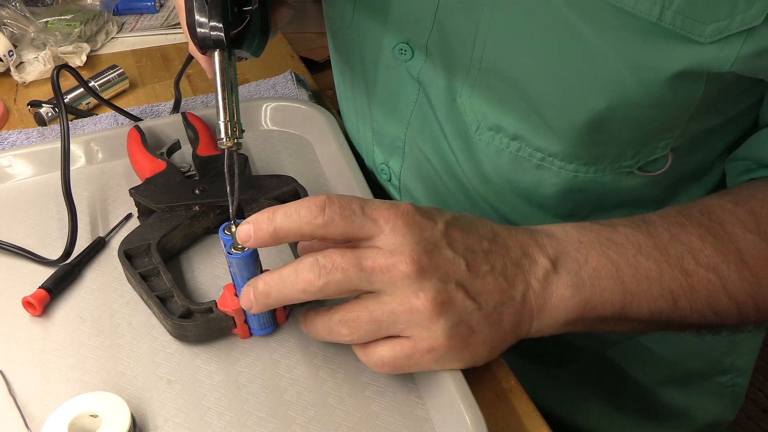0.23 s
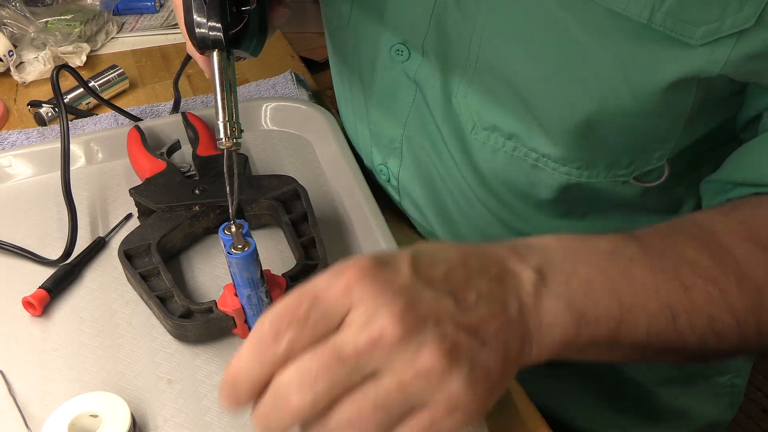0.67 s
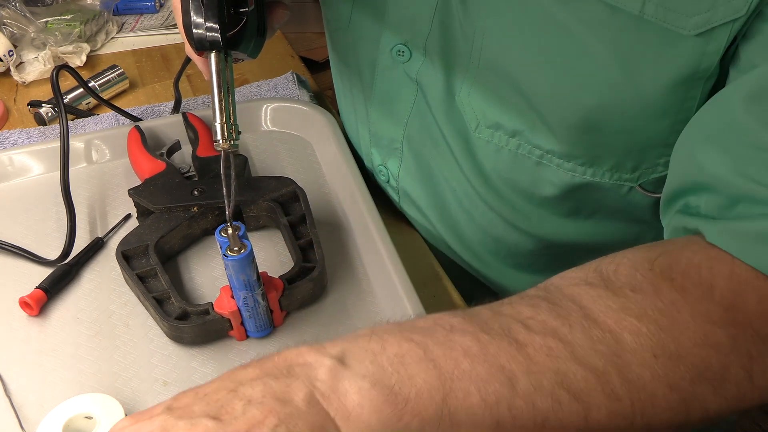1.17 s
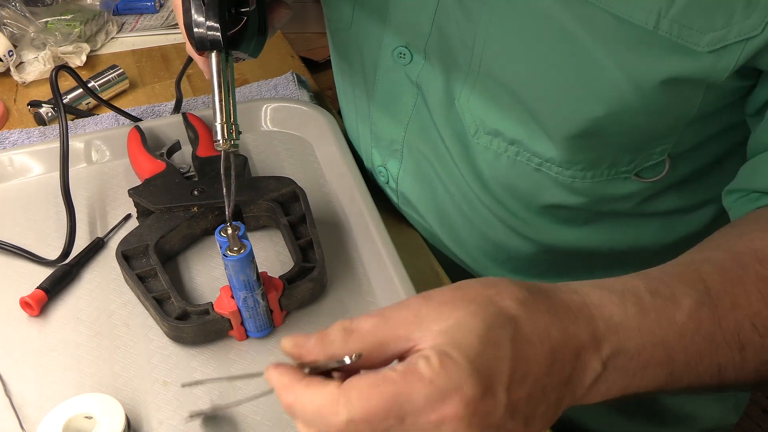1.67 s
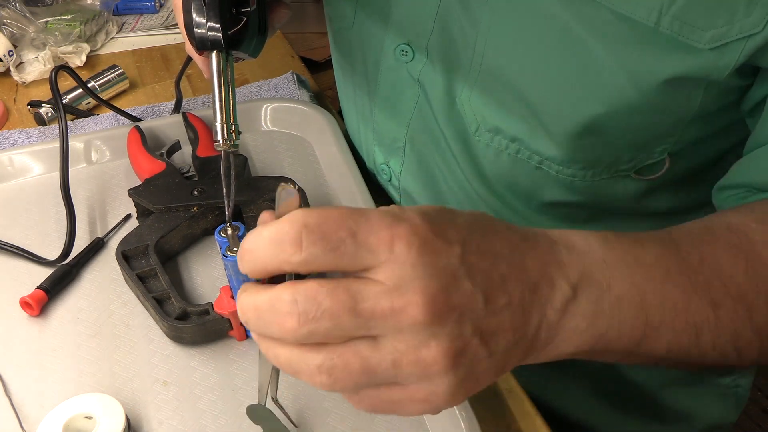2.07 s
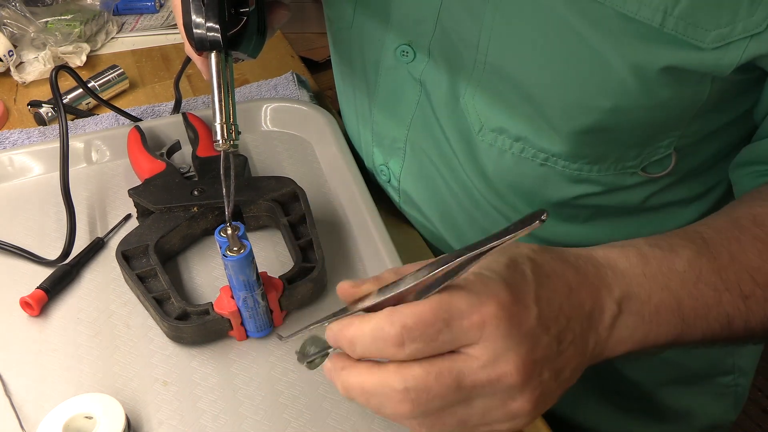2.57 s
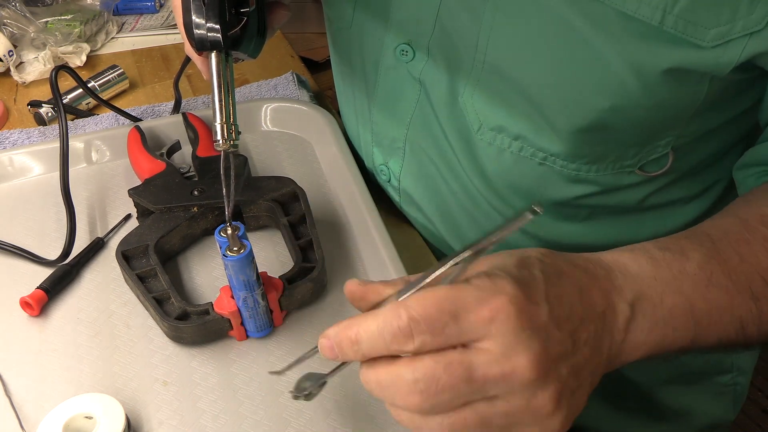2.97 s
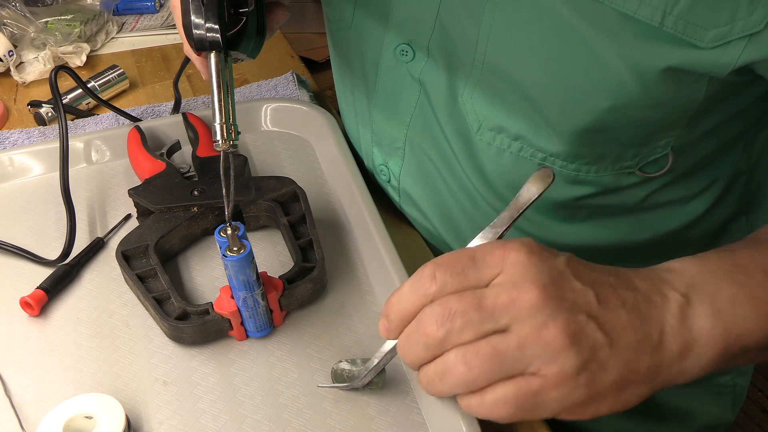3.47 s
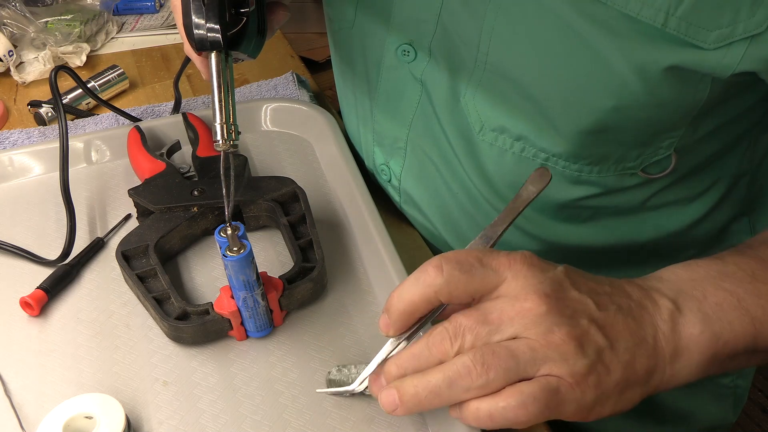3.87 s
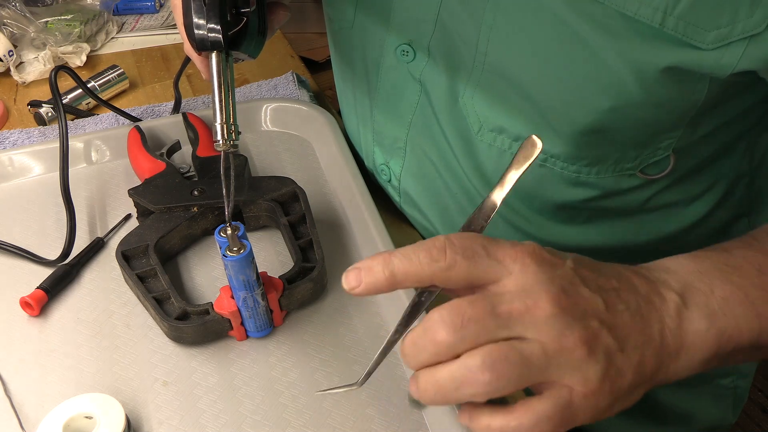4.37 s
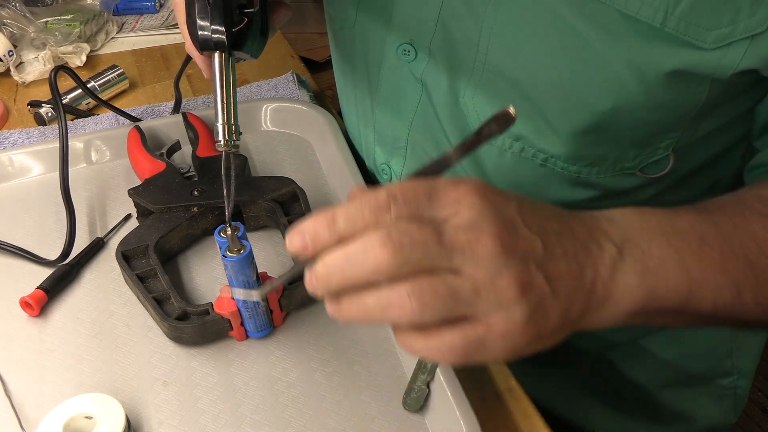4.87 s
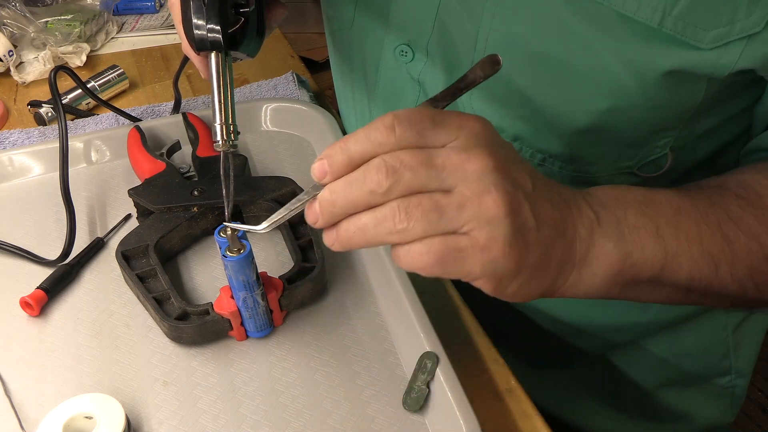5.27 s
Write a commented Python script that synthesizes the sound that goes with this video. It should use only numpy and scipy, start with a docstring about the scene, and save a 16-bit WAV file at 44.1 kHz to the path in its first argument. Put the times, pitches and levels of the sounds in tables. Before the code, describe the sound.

Close, dry clatter of steel tweezers against a hollow plastic tray, one loud knock, then sparse small taps and ticks above low rumble.

```python
"""Short hollow clatter, light metallic clicks and scrapes over a low hum, close and nearly mono.
Metal tweezers are fetched from a plastic tray, knock against it and pick up a thin metal strip.
Each knock or click is an impulse into decaying modes; each scrape is a train of tiny slips.
Filtered noise makes the rumble and hum of the small workshop, and a noise echo its reverberation."""
import sys
import numpy as np
from scipy import signal
from scipy.fft import rfft, irfft
from scipy.io import wavfile

SR = 44100
rng = np.random.default_rng(int(sys.argv[2]) if len(sys.argv) > 2 else 0)


def put_to_file(sound):
    """Save the sound as 16-bit audio at rate SR, in the file named by the first command-line argument."""
    columns = np.atleast_2d(sound).T  # one column per channel
    safe = np.clip(columns, -1, 1)
    whole_steps = np.round(safe * 32767)
    wavfile.write(sys.argv[1], SR, whole_steps.astype(np.int16))


N = 243431  # samples in the scene

# mean modes of the tray and what lies on it: pitch_hz, relative level_db, t60_s
TRAY_MODES = [(340.3, -3, 0.07), (412, 1.5, 0.043), (423, -4, 0.049), (531, -3.5, 0.046),
              (570.4, 2.5, 0.035), (673, -2.5, 0.047), (774, -3.5, 0.045), (940, -0.5, 0.02),
              (1068, 1, 0.016), (1157, -3, 0.021), (1230, -18, 0.026), (1754, 6, 0.026), (2007, 0, 0.033),
              (2280, -29, 0.028), (2660, 8, 0.026), (2730, -9, 0.055), (3400, -18, 0.047),
              (3360, -5.5, 0.065), (4430, 6, 0.045), (6240, 1, 0.037), (8080, 5.5, 0.029),
              (8450, -18, .035), (10600, -23, 0.04)]
# mean modes of the tweezers and strip: pitch_hz, relative level_db, t60_s
STEEL_MODES = [(1080, -7, 0.015), (1270, -7, 0.029), (2314, -1.5, 0.044), (2520, -12, 0.022),
               (3260, -4, 0.027), (3800, -12, 0.09), (7400, 1, 0.0051), (8500, 6, 0.0057), (8920, 7, 0.014),
               (9170, -1, 0.016), (11300, 10, 0.0053)]


def amp(db):
    """A level in decibels is twenty times the logarithm of the amplitude ratio returned here."""
    return 10 ** (np.asarray(db) / 20)


def evened(x):
    """The root mean square measures a sound's strength; here it is brought to 1."""
    return x / np.sqrt(np.mean(x ** 2) + 1e-20)


def read(points, hz):
    """Hearing is nearly logarithmic in pitch, so a table is interpolated over log frequency."""
    f, value = np.transpose(points)
    return np.interp(np.log(hz + 1), np.log(f + 1), value)


def add(mix, start_s, sound):
    """Superposition: sounds that overlap in time simply add."""
    part = mix[max(round(start_s * SR), 0):][:len(sound)]
    part += sound[:len(part)]


def band(x, edges_hz):
    """A causal band-pass keeps one range of frequencies and never sounds before its input."""
    edges_hz = np.clip(edges_hz, 20, SR / 2 - 100)
    sos = signal.butter(3, edges_hz, "band", fs=SR, output="sos")
    return signal.sosfilt(sos, x)


def coloured(x, points):
    """Spectral shaping: each frequency is weighted by a table in dB, then the rms is set to 1."""
    gain = amp(read(points, np.fft.rfftfreq(len(x), 1 / SR)))
    return evened(irfft(rfft(x) * gain, len(x)))


def decay_db(t, t60):
    """Exponential decay: the level falls in a straight line, 60 dB in one t60."""
    return -60 * t / t60


def ringing(modes, dense_db, dense_t60, spot_hz=1000, spot_db=0, scatter_db=2.5, detune_hz=12):
    """Modal response to an impulse: clear decaying modes, and a noise crack of modes too dense to part."""
    t = np.arange(SR // 5) / SR
    hz, db, t60 = np.transpose(modes)[:, :, None]
    hz = hz + detune_hz * rng.standard_normal(hz.shape)  # each contact loads the body a little differently
    favoured = np.exp(-(np.log(hz / spot_hz) / 0.088) ** 2)  # modes near the pitch of the touched spot
    db = db + scatter_db * rng.standard_normal(hz.shape) + spot_db * favoured
    clear = (amp(db + decay_db(t, t60)) * np.cos(2 * np.pi * hz * t)).sum(0)
    dense = amp(dense_db + decay_db(t, dense_t60)) * rng.standard_normal(len(t))
    return clear + dense


def range_levels(ranges, shares_db, strength_db, hardness, spot_hz=0):
    """Contact stiffness: a harder contact tilts the ranges to the treble, and the spot lifts its own."""
    low, high = np.transpose(ranges)
    octaves = np.log2(np.sqrt(low * high / (low[0] * high[0])))  # between centres, from the lowest range
    spot_lift_db = 6 * ((low < spot_hz) & (spot_hz < high))
    return strength_db + np.array(shares_db) + hardness * octaves + spot_lift_db


def contact(ring, ranges, levels_db):
    """Impact excitation: hardness and place of contact set how strongly each range answers."""
    first = round(.006 * SR)  # the levels hold for the first 6 ms
    parts = [band(ring, edges_hz) for edges_hz in ranges]
    return sum(amp(db) * part / np.std(part[:first]) for part, db in zip(parts, levels_db))


def workshop(floor_db=-41.5, hiss_db=-66.5):
    """Filtered noise: rumble and a wavering hum, common to both sides, and a faint hiss in each."""
    # spectrum of the quiet room: pitch_hz, relative level_db (per Hz)
    floor = [(11, -42), (18, -5.5), (59, -2.5), (72, -5.5), (88, -12), (120, -10), (225, -17.5),
             (344, -16.5), (374, -20.5), (589, -25.5), (927, -32), (1420, -32.5), (1880, -39.5),
             (11600, -46.5), (15800, -50)]
    # hum and murmuring resonances: pitch_hz, width_hz (at half amplitude), level_db (rms)
    hum = [(57.04, 6.8, -44.5), (118.2, 4.1, -53.5), (155.9, 3.9, -58.5), (1230, 110, -72.5)]
    hz = np.fft.rfftfreq(N, 1 / SR)
    air = amp(floor_db) * coloured(rng.standard_normal(N), floor)
    for centre_hz, width_hz, db in hum:
        resonance = 1 / (1 + (2 * (hz - centre_hz) / width_hz) ** 2)
        murmur = irfft(rfft(rng.standard_normal(N)) * resonance, N)
        air += amp(db) * evened(murmur)
    return air + amp(hiss_db) * rng.standard_normal((2, N))


def room(x, early_db=-11, early_t60=0.073, late_db=-20):
    """Reverberation: quick reflections from bench and body, then the faint tail of a small room."""
    # decay of the tail: pitch_hz, t60_s
    tail_t60 = [(120, 0.4), (500, 0.19), (2000, 0.33), (6000, 0.37), (14000, 0.042)]
    t = np.arange(SR // 2) / SR
    # sparse reflections of random sign, 3000 per second on average
    taps = rng.choice([-1., 1.], len(t)) * (rng.random(len(t)) < 3000 / SR) * (t > .004)
    hz, at, z = signal.stft(taps, SR, nperseg=256)
    fading = z * amp(decay_db(at, read(tail_t60, hz)[:, None]))
    late = signal.istft(fading, SR, nperseg=256)[1][:len(t)]
    early = rng.standard_normal(len(t)) * (t > .003) * amp(decay_db(t, early_t60))
    echo = amp(early_db) * early / np.linalg.norm(early) + amp(late_db) * late / np.linalg.norm(late)
    return signal.fftconvolve(x, echo)[:N]


def scrapes(slips_per_s=5000, uneven_db=3):
    """Stick-slip friction: tiny impulses of sliding steel ring tray and steel and hiss at the contact."""
    # strokes: start_s, length_s, strength_db, hardness_db_per_octave, favoured pitch_hz of the rubbed spot
    strokes = [(0, .19, -60.5, -3, 2580), (.541, 0.018, -50.5, -2, 2480), (1.124, 0.033, -48.5, -0.5, 970),
               (1.148, 0.049, -48, 0.7, 850), (1.182, .091, -54, .5, 613), (1.241, 0.041, -48.5, .6, 696),
               (1.868, 0.024, -34, -5.5, 413), (1.891, 0.04, -38, -2.5, 2520),
               (3.326, .0194, -33, -2.2, 415), (3.931, 0.04, -56, 0.7, 1140),
               (4.203, .083, -70.5, 4.5, 620)]
    # edges of the tray, steel and hiss ranges: low_hz, high_hz
    ranges = [(300, 1300), (1550, 3050), (4000, 12000)]
    # share of an ordinary stroke in tray, steel and hiss: level_db
    shares_db = [0.5, -6.5, -9]
    # colour of steel sliding on plastic: pitch_hz, relative level_db
    hiss_colour = [(2000, -7), (4000, -7), (5500, -7), (8500, -3), (11500, -13), (13500, -18), (16000, -32)]
    out = np.zeros(N)
    for start_s, length_s, strength_db, hardness, spot_hz in strokes:
        tray_db, steel_db, hiss_db = range_levels(ranges, shares_db, strength_db, hardness, spot_hz)
        n = int(length_s * SR)
        sizes = rng.standard_normal(n) * amp(uneven_db * rng.standard_normal(n))
        slips = sizes * (rng.random(n) < slips_per_s / SR)
        slips = np.pad(slips * signal.windows.tukey(n, .6), (0, SR // 10))  # silence lets the ring fade
        tray = ringing(TRAY_MODES, dense_db=25.5, dense_t60=0.018, spot_hz=spot_hz, spot_db=22.0)
        steel = ringing(STEEL_MODES, dense_db=38, dense_t60=0.029)
        for ring, edges_hz, db in (tray, ranges[0], tray_db), (steel, ranges[1], steel_db):
            part = signal.fftconvolve(slips, band(ring, edges_hz))[:len(slips)]
            add(out, start_s, amp(db) * part / np.std(part[:n]))
        hiss = coloured(slips, hiss_colour)
        add(out, start_s, amp(hiss_db) * hiss / np.std(hiss[:n]))
    return out


def clicks():
    """Damped modes: tips and strip snap together, and the fingers damp the steel quickly."""
    # light clicks of steel and strip: start_s, strength_db, hardness_db_per_octave
    click_table = [(0.616, -41, -12), (0.637, -49, -6.5), (1.3743, -39, -0.5), (1.436, -44.5, -5),
                   (4.0135, -54, -0.5), (4.0251, -41, -0.5), (4.0333, -39.5, 4), (4.094, -54, -2.5),
                   (4.389, -53, -4), (4.44, -61, 2.5), (4.461, -65, 3), (4.466, -43, -6.5)]
    # edges of the clack, ring and tick ranges of the steel: low_hz, high_hz
    ranges = [(950, 1740), (2300, 5100), (6700, 10600)]
    # share of an ordinary click in clack, ring and tick: level_db
    shares_db = [-1.5, -2.5, 0]
    out = np.zeros(N)
    for start_s, strength_db, hardness in click_table:
        levels_db = range_levels(ranges, shares_db, strength_db, hardness)
        ring = ringing(STEEL_MODES, dense_db=15.5, dense_t60=0.014)
        add(out, start_s, contact(ring, ranges, levels_db))
    return out


def knocks(thud_growth=1.307):
    """Impact on a body: the tweezers hit the tray and bounce; a heavy knock also pushes the whole tray."""
    # knocks: start_s, strength_db, hardness_db_per_octave, favoured pitch_hz of the struck spot
    knock_table = [(1.113, -25.5, 1.53, 1050), (1.124, -31.5, -6, 343), (1.138, -39, -1, 600),
                   (1.2393, -40.5, 0, 673), (1.2645, -36, -7, 676), (1.295, -33, -5, 340),
                   (1.304, -40, 0, 920), (1.739, -17, 3.5, 440), (1.747, -21.5, 2.5, 674),
                   (1.7558, -42, 7, 430), (1.7981, -20, 3.5, 422), (1.811, -31, -0.5, 404),
                   (1.8221, -20.5, -.5, 425), (1.834, -29.5, -1.5, 412), (1.912, -29, -15, 400),
                   (1.923, -30, 0.5, 470), (2.0921, -11.5, -1.53, 1070), (2.138, -32, -1.5, 453),
                   (2.1442, -40, -.5, 523), (2.394, -28.5, -3, 1020), (2.425, -31.5, -2.6, 580),
                   (2.442, -39.5, -1, 950), (3.2625, -30.5, 0.8, 500), (3.3185, -27, -1.1, 434),
                   (3.337, -24.5, -3, 450), (3.343, -39, 0.5, 420), (3.924, -37, -1.5, 450),
                   (4.029, -29.5, 2, 397)]
    # edges of the body, clack, ring and tick ranges: low_hz, high_hz
    ranges = [(230, 680), (850, 1400), (2100, 3400), (4100, 11000)]
    # share of an ordinary knock in body, clack, ring and tick: level_db
    shares_db = [-0.5, -6, -16.5, -30.5]
    # the tray bounces on the bench as a whole: pitch_hz, relative level_db, t60_s
    thud_modes = [(145, -3.5, 0.13), (169.4, -7.5, 0.11)]
    out, t = np.zeros(N), np.arange(SR // 5) / SR
    thud = sum(amp(db + decay_db(t, t60)) * np.sin(2 * np.pi * hz * t) for hz, db, t60 in thud_modes)
    for start_s, strength_db, hardness, spot_hz in knock_table:
        levels_db = range_levels(ranges, shares_db, strength_db, hardness, spot_hz)
        ring = ringing(TRAY_MODES, dense_db=15.5, dense_t60=0.041, spot_hz=spot_hz, spot_db=10.5)
        # dB of thud per dB of body above 1: the thud gains on the body as knocks grow heavier
        push = amp(thud_growth * levels_db[0]) * thud
        add(out, start_s, -push - contact(ring, ranges, levels_db))
    return out


def scene(side_db=-35, click_echo_db=-3):
    """Direct and reverberant sound add; clicks are drier, and only a trace of echo differs by side."""
    on_tray, steel = knocks() + scrapes(), clicks()
    sent = on_tray + amp(click_echo_db) * steel
    side = amp(side_db) * room(sent) * np.array([[1], [-1]])  # opposite sign left and right
    return on_tray + steel + room(sent) + side + workshop()


def record(dry, edge_hz=15850):
    """Saturation and band limit: the input rounds off the highest peaks, then a low-pass follows."""
    rounded = dry / (1 + (dry / .9) ** 6) ** (1 / 6)
    low_pass = signal.firwin(511, edge_hz, window=("kaiser", 9), fs=SR)
    return signal.oaconvolve(rounded, low_pass[None], "same")


dry = scene()
out = record(dry)
put_to_file(out)
```